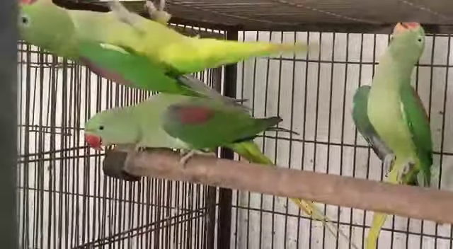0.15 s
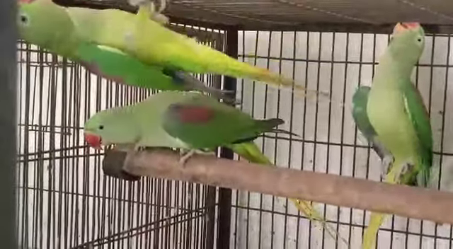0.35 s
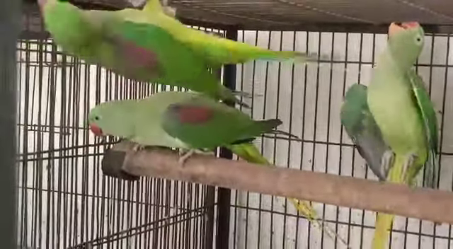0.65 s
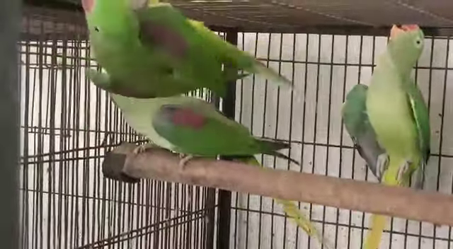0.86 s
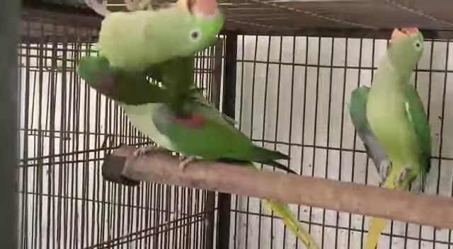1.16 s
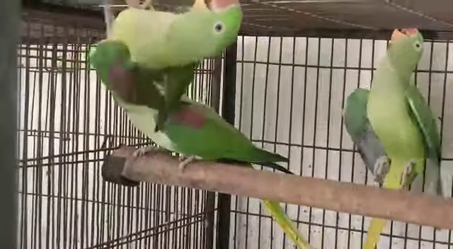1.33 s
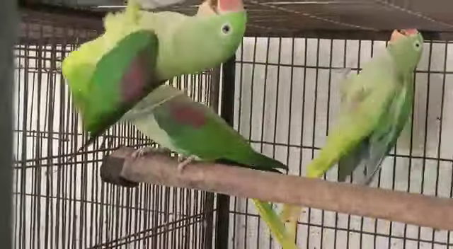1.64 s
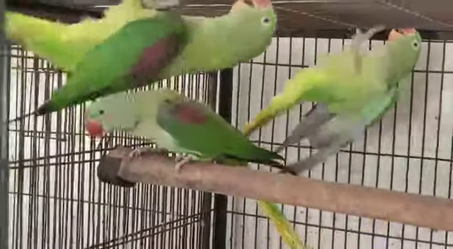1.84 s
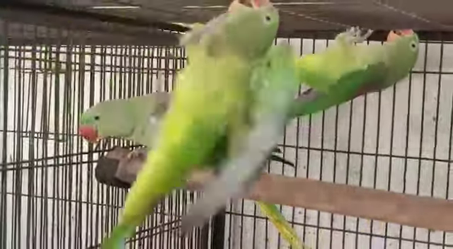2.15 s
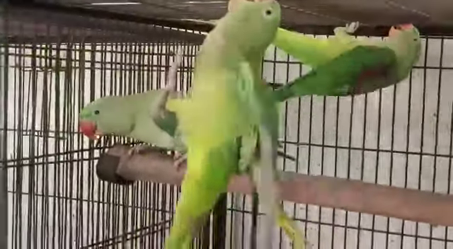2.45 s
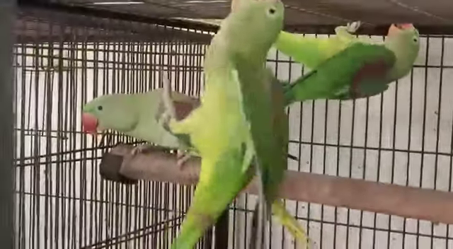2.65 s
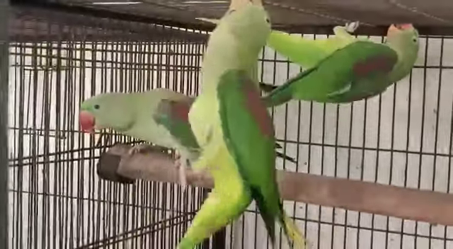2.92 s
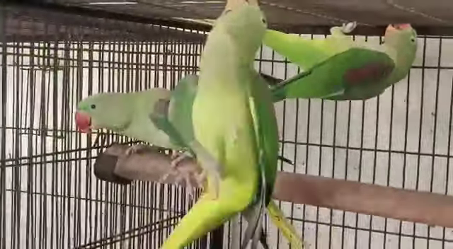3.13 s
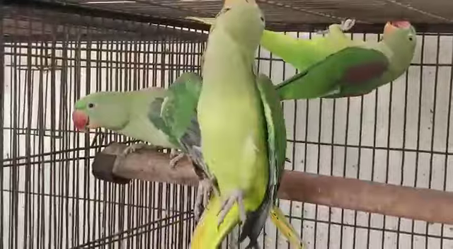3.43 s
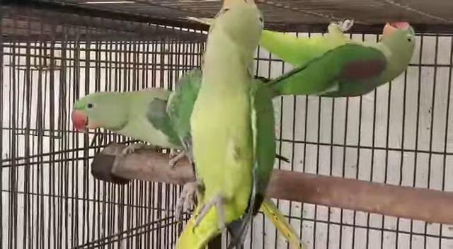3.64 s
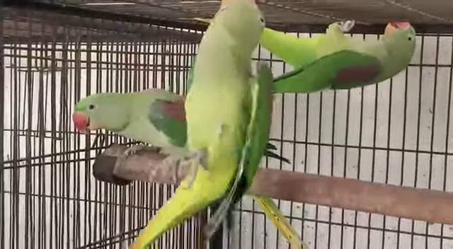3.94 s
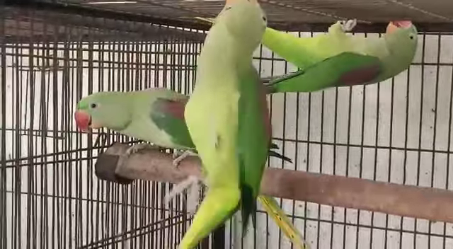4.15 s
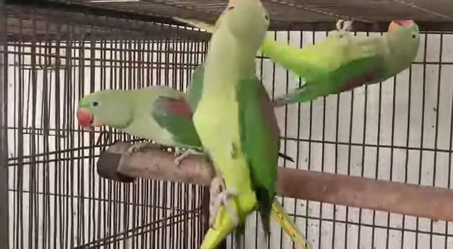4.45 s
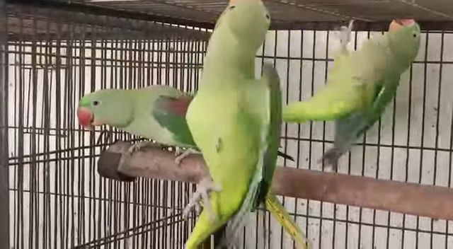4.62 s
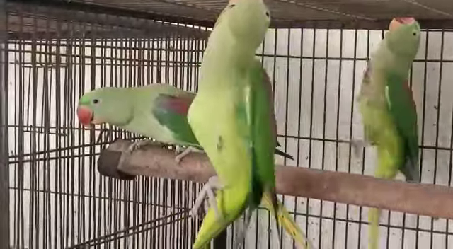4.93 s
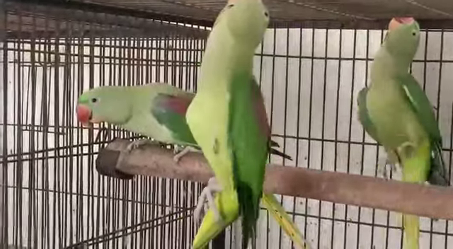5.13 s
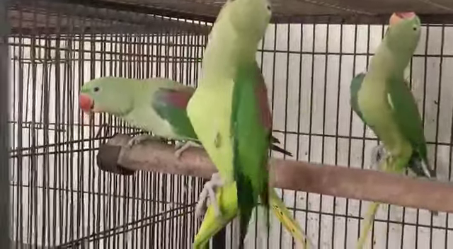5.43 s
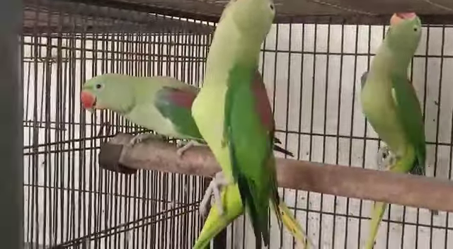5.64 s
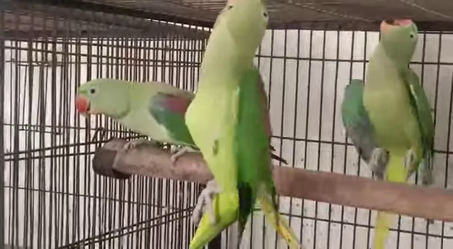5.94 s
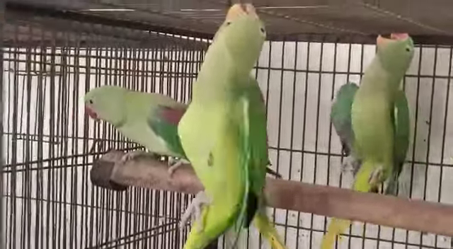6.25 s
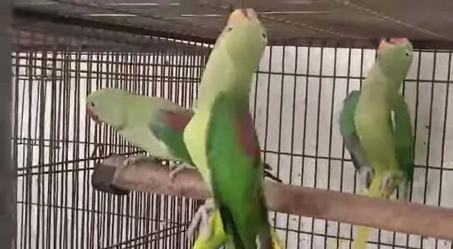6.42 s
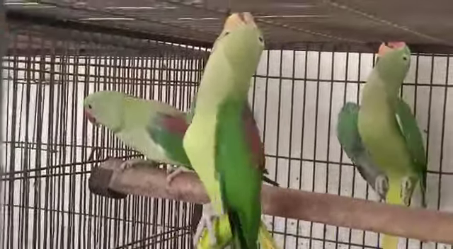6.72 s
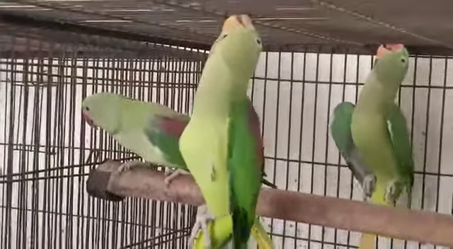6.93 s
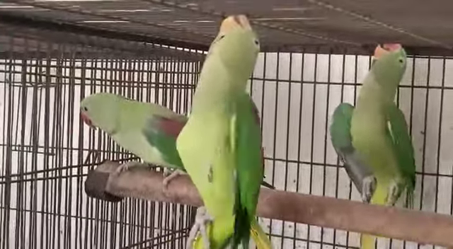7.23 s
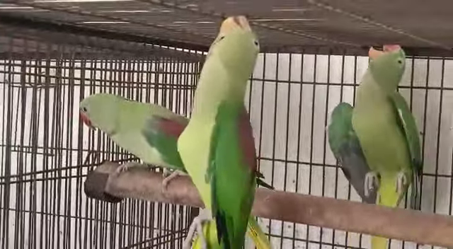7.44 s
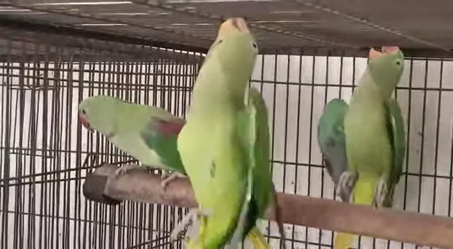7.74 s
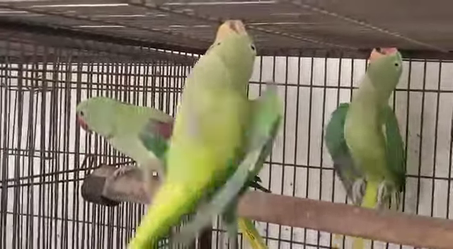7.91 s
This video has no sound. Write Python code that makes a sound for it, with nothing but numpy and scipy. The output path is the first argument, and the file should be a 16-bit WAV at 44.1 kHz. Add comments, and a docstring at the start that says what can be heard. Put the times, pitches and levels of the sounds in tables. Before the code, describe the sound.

Seven brief, loud parrot squawks ring off hard walls, whistly and raspy by turns, with light feather and claw brushes and a weak low engine hum.

```python
"""In a hard-walled room, parakeets squawk seven times from a wire cage.
Each squawk strings together notes of a vibrating membrane: whistles that leap in register, then a
fall split into half-tones with a rasp. One tone colour filters them all and room echoes follow.
Filtered noise makes puffs of air on the microphone, brushes on the wires, rumble, wash and hiss;
a distant engine hums as two wavering harmonics."""
import sys
import numpy as np
from scipy import signal
from scipy.fft import rfft, irfft, next_fast_len
from scipy.io import wavfile
from scipy.ndimage import uniform_filter1d, minimum_filter1d

SR = 44100
rng = np.random.default_rng(int(sys.argv[2]) if len(sys.argv) > 2 else 0)


def transcribe(signal):
    """Save signal, clipped to [-1, 1], as a 16-bit WAV file at the path in sys.argv[1]."""
    frames = np.atleast_2d(signal).T
    limited = np.clip(frames, -1, 1)
    pcm = np.round(limited * 32767).astype(np.int16)
    wavfile.write(sys.argv[1], SR, pcm)


N = 356151
TIME = np.arange(N) / SR   # s
CUTOFF_HZ = 15600

# Background levels over time. Each row: time in s, relative rumble level in dB, relative wash level in dB.
BACKGROUND = [(0.0, -54, -55), (0.4, -51.5, -53), (0.74, -64.5, -63), (1.57, -63, -63.5),
              (2.32, -54, -57.5), (2.72, -63, -64.5), (3.26, -74, -78), (3.87, -71.5, -71.5),
              (4.36, -79, -82.5), (5.35, -70.5, -75), (6.03, -66, -67.5), (6.34, -75, -79),
              (7.38, -74.5, -75), (8.08, -79, -82.5)]
# Spectra of rumble, wash and steady room hiss. Each row: frequency in Hz, relative level in dB.
RUMBLE = [(15, -66.5), (25, -30), (75, -3.5), (93, -0.5), (135, 5), (194, -2), (313, -1), (403, -10),
          (532, -24.5), (600, -14), (780, -48), (1320, -120)]
WASH = [(240, -35.5), (400, -9), (602, -2), (979, -2.5), (1120, 2.5), (1430, -3), (2510, -3.5), (4530, -22),
        (6220, -18), (10100, -52.5), (15000, -50.5)]
HISS = [(470, -39.5), (800, -18), (938, -13), (1130, 1.5), (1690, -3), (1890, 0), (2270, 1.5), (3400, -9),
        (5220, -16), (6930, -11.5), (9890, -46), (15000, -42)]
HISS_DB = -62
# Likeness of the two ears in noise. Each row: frequency in Hz, left-right correlation from -1 to 1.
LIKENESS = [(40, 1), (130, .65), (300, 0.75), (600, 0.88), (1200, -0.44), (2400, 0.16), (5000, -0.24),
            (12000, -0.15)]
# Louder spells of the engine. Each row: start in s, length in s, level in dB added to the idle.
ENGINE_SWELLS = [(0, 3.05, -66), (4.9, .95, -60.5)]
# Mean engine pitch over time. Each row: time in s, pitch in Hz.
ENGINE_SPEED = [(0, 143), (4.9, 141.8), (6, 150.2), (8.08, 151)]
ENGINE_IDLE_DB, ENGINE_RISE_S, ENGINE_FADE_S = -77.5, 0.063, 0.1

# Claws and feathers on the wires. Each row: start in s, relative level in dB, rise in s, fade time constant in s.
BRUSHES = [(.005, -55.5, 0.0025, 0.088), (.101, -51, 0.0045, 0.12), (.4, -57.5, 0.015, .05),
           (1.246, -62.5, 0.0091, 0.15), (1.429, -63.5, 0.014, .08), (1.696, -61, 0.0067, 0.023),
           (1.726, -56, 0.0043, 0.063), (1.94, -58, 0.0018, 0.075), (2.051, -60, .003, 0.04),
           (5.659, -63, 0.0068, .03)]
# Modes of the wires. Each row: frequency in Hz, relative drive in dB, time to fall 60 dB in s.
WIRES = [(5100, -9.5, 0.11), (6300, -7, 0.26), (6500, -3.5, .15), (8240, -12.5, .2)]
# Spectrum of rustling feathers. Each row: frequency in Hz, relative level in dB.
FEATHERS = [(1500, -17), (3500, -1), (6500, 4.5), (8000, -7), (11000, -26.5), (15000, -21)]

# How the bird faces for each squawk. Each row: start in s, brightness in dB per octave before each note's own
# is added, left-right level in dB, left ear lag in s, room send in dB.
SQUAWKS = [(.5, 1.5, -1.5, .00008, -0.9), (2.3, -1.24, 0.5, -.00034, 0.26), (2.58, -1.5, 0, .00032, -0.9),
           (2.95, -1, -0.5, .00032, 1), (3.7, 1, 0.4, .00001, -2.5), (5.9, 1.3, 1.5, .00008, 0.2),
           (7.4, 0.9, 1.6, .00008, -0.1)]
# Tone colour of the voices, from throat, room and microphone together.
# Each row: frequency in Hz, relative level in dB.
VOICE_COLOUR = [(450, -23), (950, -20), (1250, -17), (1550, -15), (2050, 0), (2450, 7), (3400, -2),
                (4050, -2.5), (4450, -12.5), (4800, -10), (5400, -7.5), (6300, -1.5), (7100, -12.5),
                (7900, -18), (12000, -44), (15000, -32.5)]
# Head shadow: the left ear hears less treble. Each row: frequency in Hz, left-right level in dB.
SHADE = [(1500, -3), (4000, -0.5), (7000, -9.5), (10000, -11.5)]
# Echoes off the cage roof, tray and nearest walls. Each row: left delay in s, right delay in s, gain in dB.
ECHOES = [(.0031, 0.0025, -8), (.0058, .0064, -5), (.0093, .0087, -16), (0.0103, .0131, -11.5),
          (0.0164, .0166, -17.5), (.0215, .0229, -16)]
ROOM_T60_S = 0.37
ATTACK_S, RELEASE_S = .004, .007   # every note sounds for its length, then its release
WAVER_SHARE, WAVER_HZ = .003, 45   # no note is quite steady

# A clear squawk runs bark, high whistle, low whistle, fall (and croak);
# a harsh one runs lead-in, (grating,) fall, standing-out third half-tone or croak. Note levels are relative.
# Opening barks. Each row: start in s, length in s, level in dB, pitch after the catch in Hz, half-tone share 0-1.
BARKS = [(.558, 0.015, -10.5, 2566, 1), (3.782, 0.016, -20, 2567, 0.82), (5.964, .013, -17, 2360, .05),
         (7.426, 0.01, -20, 3240, 0.62)]
CATCH_HZ, CATCH_SINK_HZ_PER_S, CATCH_S = 2472, 71000, .006
# High whistles. Each row: start in s, length in s, pitch in Hz before the droop, level in dB before the
# swell, droop time constant in s.
HIGH_WHISTLES = [(0.583, 0.034, 3582, -11, 0.015), (3.806, 0.04, 3520, -15, 0.0037),
                 (5.982, .055, 3650, -18.5, .005), (7.454, 0.048, 3570, -19.5, 0.0039)]
DROOP_SHARE, DROOP_SWELL_DB = .14, 1.5
# Puffs of air. Each row: centre in s, Gaussian spread in s, relative level in dB, low edge in Hz, top edge in Hz.
PUFFS = [(0.608, 0.0075, -45.5, 81.5, 255), (0.758, 0.0074, -46.5, 70, 316),
         (3.822, 0.022, -46.5, 72.8, 180), (3.835, 0.013, -41.5, 400, 1200),
         (3.844, 0.0077, -33, 74.4, 192), (3.968, 0.0098, -40.5, 70, 394), (6.036, 0.0023, -43.5, 504, 660),
         (7.496, 0.01, -49.5, 67.4, 160), (7.629, 0.027, -54, 71.5, 500)]
# Low whistles after the break. Each row: start in s, length in s, base pitch in Hz, opening level in dB,
# fade in dB per s, upward creep in Hz per s.
LOW_WHISTLES = [(.621, 0.079, 2289, 0.5, 326, 950), (3.847, 0.071, 2336, -10, 139, 3210),
                (6.039, 0.075, 2370, -8.5, 221.5, 3870), (7.503, 0.063, 2393, -9.5, 169, 3370)]
SCOOP_HZ, SCOOP_S = 268, .006
# Falling split notes. Each row: start in s, length in s, hold in s, slide time constant in s, slide shape
# (1 eases out, more is S-shaped), top pitch in Hz, landing pitch in Hz, top level in dB, landing level in dB,
# landing half-tone share 0-1, sliding rasp, landing rasp (both on top of a base), brightness in dB per octave.
FALLS = [(0.694, 0.11, 0.03, 0.047, 1.34, 3394, 2072, -18.5, -8, 0.41, 0.085, 0.18, 0.5),
         (2.417, 0.067, 0.0031, 0.031, 1.59, 3860, 2418, -18, -8.5, 0.24, .75, .9, -.8),
         (2.731, 0.12, 0.0014, .04, 1.48, 3205, 1911, -16, -23.5, .7, 0.78, 0.27, -0.13),
         (3.098, 0.11, 0.00078, 0.044, 1.45, 3128, 1974, -21, -30, 0.74, 0.87, 0.26, -.3),
         (3.913, .108, 0.024, .032, 1.25, 3503, 2314, -19, -12.5, 0.39, 0.099, .14, 0.33),
         (6.104, 0.11, 0.0047, .04, 3.83, 3980, 2732, -22.5, -13.5, 0.37, .45, 0.17, .3),
         (7.577, 0.1, 0.00089, 0.032, 2.48, 4016, 2610, -21.5, -17, 0.5, 0.22, 0.29, -0.00067)]
TOP_HALF_SHARE, BASE_RASP = 0.48, 0.11
# Croaks at the very end. Each row: start in s, length in s, level in dB.
CROAKS = [(.814, .02, -19.5), (2.467, 0.02, -16.5), (4.016, .018, -20)]
CROAK_HZ, CROAK_SINK_S = 2113, .03
# Pure notes leading into a harsh squawk. Each row: start in s, length in s, mid-note pitch in Hz,
# peak level in dB, swell time in s.
LEAD_INS = [(2.387, 0.037, 2224, -10, 0.034), (2.609, .04, 2396, -12, 0.013),
            (2.975, .04, 2388, -13.5, 0.031)]
LEAD_SWELL_DB_PER_S, LEAD_RISE_HZ_PER_S = 419, 3000
# Gratings. Each row: start in s, length in s, pitch in Hz, opening level in dB, second tone level in dB.
GRATINGS = [(2.647, .083, 2473, -12, -27), (3.017, 0.07, 2478, -15.5, -31)]
SECOND_TONE_HZ, SECOND_RISE_HZ_PER_S = 3550, 2900
UNDERTONE_HZ, UNDERTONE_DB, GRATING_FADE_DB_PER_S = 2030, -7, 126.5
# The third half-tone standing out as two harsh falls end, sinking to a settled pitch.
# Each row: start in s, length in s, settled pitch in Hz, level in dB.
THIRD_HALF_TONES = [(2.79, .058, 2882, -19), (3.161, .046, 2909, -21.5)]
THIRD_SINK_HZ, THIRD_SINK_S = 220, .016


def from_db(db):
    """A level in decibels is twenty times the logarithm of the gain."""
    return 10 ** (np.asarray(db) / 20)


def unit_power(x):
    """Division by the root mean square gives unit power."""
    return x / np.sqrt(np.mean(x ** 2) + 1e-20)


def in_time(rows, t):
    """Linear interpolation reads each column of a time table at the times t."""
    s, *columns = np.transpose(rows)
    return [np.interp(t, s, column) for column in columns]


def at_hz(points, hz):
    """Interpolation on a logarithmic frequency axis reads a spectrum."""
    f, value = np.transpose(points)
    return np.interp(np.log(np.maximum(hz, 1)), np.log(f), value)


def wobble(rate_hz, size):
    """Low-passed white noise of unit power wanders slowly."""
    low_pass = signal.butter(2, rate_hz, fs=SR, output="sos")
    settled = signal.sosfilt(low_pass, rng.standard_normal(2 * size))[size:]
    return unit_power(settled)


def coloured(spectrum, size):
    """Shaping white noise in frequency colours it; mixing mid and side sets its left-right correlation."""
    hz = np.arange(size // 2 + 1) * SR / size
    mid, side = rfft(rng.standard_normal((2, size)))
    alike = np.clip(at_hz(LIKENESS, hz), -1, 1)
    pair = np.sqrt(1 + alike) * mid + np.sqrt(1 - alike) * side * [[1], [-1]]
    # fade beyond both ends of the table
    below_top = 1 / (1 + (hz / spectrum[-1][0]) ** 8)
    above_low = 1 - 1 / (1 + (hz / spectrum[0][0]) ** 8)
    shape = below_top * above_low * from_db(at_hz(spectrum, hz))
    return unit_power(irfft(pair * shape, size))


def engine():
    """A periodic source radiates harmonics; random drift of its rate and strength makes it throb."""
    pitch, = in_time(ENGINE_SPEED, TIME)
    level = from_db(ENGINE_IDLE_DB)
    for s, length, db in ENGINE_SWELLS:
        rise = np.clip((TIME - s) / ENGINE_RISE_S, 0, 1)
        fade = np.exp(-np.maximum(TIME - s - length, 0) / ENGINE_FADE_S)
        level = level + from_db(db) * rise * fade
    phase = 2 * np.pi * np.cumsum(pitch * (1 + 0.017 * wobble(10, N))) / SR
    throb = 1 + .25 * wobble(25, N)
    harmonics = np.sin(phase) + 0.11 * np.sin(2 * phase)
    return np.sqrt(2) * level * harmonics * throb


def background(rumble_db=5.5, wash_db=9.5):
    """Independent sources add: changing rumble and wash, the engine's hum and a steady hiss."""
    rumble, wash = in_time(BACKGROUND, TIME)
    hum = engine()
    lumps_db = 1.6 * wobble(12, N)   # the rumble swells and sags unevenly
    low = hum + from_db(rumble + rumble_db + lumps_db) * coloured(RUMBLE, N)
    low = low * from_db([[-1.8], [1.8]])   # stronger on the right
    washing = from_db(wash + wash_db) * coloured(WASH, N)
    return low + washing + from_db(HISS_DB) * coloured(HISS, N)


def brushes(ring_db=-8.0):
    """Friction is a noise force; it rustles in the feathers and excites the wires' damped resonances."""
    touch = 0
    for s, db, rise, fade in BRUSHES:
        decay = np.exp(-np.clip((TIME - s) / fade, 0, 20))
        touch = touch + from_db(db) * np.clip((TIME - s) / rise, 0, 1) * decay
    rustle = touch * coloured(FEATHERS, N) * np.exp(0.23 * wobble(200, N))
    rings = 0
    for hz, db, t60 in WIRES:
        radius, angle = from_db(-60 / (t60 * SR)), 2 * np.pi * hz / SR   # decay and turn per sample
        poles = [1, -2 * radius * np.cos(angle), radius ** 2]
        rings = rings + from_db(db) * signal.lfilter([0, np.sin(angle)], poles, rustle)
    ringing = from_db(ring_db) * rustle.std() * unit_power(rings)
    return (rustle + ringing) * from_db([[-2], [2]])


def clock(length):
    """A note's local time runs from its onset to the end of its release."""
    return np.arange(int((length + RELEASE_S) * SR)) / SR


def to_ears(tone, air, air_db_per_octave, pan_db, lag_s):
    """Source and filter: one tone colour shapes tone and turbulence; the ears differ by lag and head shadow."""
    size = len(tone)
    padded = next_fast_len(2 * size, True)
    hz = np.arange(padded // 2 + 1) * SR / padded
    tone, air = rfft(np.array([tone, air]), padded)
    air *= from_db(air_db_per_octave * np.log2(np.maximum(hz / 2400, 1)))
    air *= hz ** 2 / (hz ** 2 + 700 ** 2)   # little turbulence below 700 Hz
    side = from_db((pan_db + at_hz(SHADE, hz)) / 2)
    ears = np.array([side * np.exp(-2j * np.pi * hz * lag_s), 1 / side])
    heard = (tone + air) * from_db(at_hz(VOICE_COLOUR, hz)) * ears
    return irfft(heard, padded)[:, :size + size // 2]


def syrinx(s, pitch, level_db, half, rasp, edge_db, attack_s=ATTACK_S):
    """Period doubling adds half-tones to the membrane's harmonics; strain adds jitter, turbulence and rattle.

    Returns the first sample, the stereo sound and the room send in dB."""
    slope_db, half_db, top_db = -5.5, 4.5, -4.0   # slope per octave
    jitter, jitter_hz, flutter, flutter_hz = .05, 480, 0.74, 240
    rasp_db, air_slope_db = -5, -8.0
    _, facing_db, pan_db, lag_s, send_db = [row for row in SQUAWKS if row[0] <= s][-1]
    bright_db = facing_db + edge_db
    size = len(pitch)
    t = TIME[:size]
    rise, release = np.clip(t / attack_s, 0, 1), np.clip((t[-1] - t) / RELEASE_S, 0, 1)
    envelope = rise * release * from_db(level_db)
    half, rasp = np.clip(half, 0, 1), np.clip(rasp, 0, 1)
    waver = WAVER_SHARE * wobble(WAVER_HZ, size) + jitter * rasp * wobble(jitter_hz, size)
    phase = 2 * np.pi * np.cumsum(pitch * (1 + waver)) / SR
    multiple = np.arange(1, 21)[:, None] / 2   # half-tones lie between the harmonics
    partial_hz = multiple * pitch
    # sharper closures in the split register bring out the overtones
    tilt_db = (slope_db * (1 - 0.29 * half) + bright_db) * np.log2(np.maximum(multiple, 1))
    # the membrane closes softly, so the topmost overtones stay faint
    soft_db = top_db * np.clip((partial_hz - 7300) / 1000, 0, 1)
    gain = from_db(tilt_db + soft_db) * (partial_hz < CUTOFF_HZ)
    gain[::2] *= half * from_db(half_db)
    # divide by the level the tone colour will pass, so that notes keep their set level
    passed = np.sqrt(np.sum((gain * from_db(at_hz(VOICE_COLOUR, partial_hz))) ** 2, axis=0) / 2)
    tone = np.sum(gain * np.sin(multiple * phase), axis=0) / passed
    air = rng.standard_normal(size) * rasp ** 2 * from_db(rasp_db)
    depth = flutter * rasp
    rattle = np.exp(depth * 2 * np.tanh(wobble(flutter_hz, size) / 2) - depth ** 2 / 2)
    strength = rattle * envelope
    voice = to_ears(tone * strength, air * strength, air_slope_db + bright_db, pan_db, lag_s)
    return int(s * SR), voice, send_db


def bark(s, length, db, split_hz, half):
    """A register jump: the voice catches on a sinking squeak, then leaps into a rough split burst."""
    t = clock(length)
    caught = t > CATCH_S
    pitch = np.where(caught, split_hz, CATCH_HZ - CATCH_SINK_HZ_PER_S * t)
    return syrinx(s, pitch, db, half * caught, rasp=0.84, edge_db=-1.3)


def room(x, late_db=0.0, build_s=0.0036, treble_db=-3.5):
    """Convolution with discrete early echoes and an exponentially decaying diffuse tail reverberates."""
    t = TIME[:SR]
    decay = from_db(-60 * t / ROOM_T60_S)
    late = rng.standard_normal((2, SR)) * decay * (1 - np.exp(-t / build_s))
    response = from_db(late_db) * unit_power(late) / np.sqrt(SR)
    for left_s, right_s, db in ECHOES:
        response[[0, 1], [round(left_s * SR), round(right_s * SR)]] += from_db(db)
    size = next_fast_len(N + SR)
    hz = np.arange(size // 2 + 1) * SR / size
    dull = from_db(treble_db * hz / 7000)   # treble_db is the loss at 7 kHz
    return irfft(rfft(x, size) * rfft(response, size) * dull, size)[:, :N]


def high_whistle(s, length, hz, db, droop_s):
    """Rising strain drives a clean held note louder, flatter and rougher towards the register break."""
    strain = np.exp(np.minimum(clock(length) - length, 0) / droop_s)
    pitch = hz * (1 - DROOP_SHARE * strain)
    return syrinx(s, pitch, db + DROOP_SWELL_DB * strain, half=.03, rasp=0.033 + 0.37 * strain, edge_db=-1.8)


def puffs():
    """Eddies at the microphone make short band-limited pressure noise, partly shared by both channels."""
    out = np.zeros((2, N))
    for s, spread_s, db, low_hz, top_hz in PUFFS:
        near = np.flatnonzero(abs(TIME - s) < .1)
        band = signal.butter(2, [low_hz, top_hz], "band", fs=SR, output="sos")
        eddies = unit_power(signal.sosfilt(band, rng.standard_normal((3, len(near)))))
        gust = from_db(db) * np.exp(-.5 * ((TIME[near] - s) / spread_s) ** 2)
        out[:, near] += (eddies[0] + 0.76 * eddies[1:]) * gust
    bass_cut = signal.butter(3, 75, "high", fs=SR, output="sos")
    return signal.sosfilt(bass_cut, out + 1e-18) * from_db([[-3], [3]])


def low_whistle(s, length, hz, db, fade_db_per_s, creep_hz_per_s):
    """The lower register: pitch scoops down exponentially, then creeps up as the level fades."""
    t = clock(length)
    pitch = hz + SCOOP_HZ * np.exp(-t / SCOOP_S) + creep_hz_per_s * t
    return syrinx(s, pitch, db - fade_db_per_s * t, half=0.008, rasp=0.23, edge_db=1.6)


def fall(s, length, hold, slide, shape, top_hz, landing_hz, top_db, landing_db,
         landing_half, sliding_rasp, landing_rasp, edge_db):
    """Relaxation: a period-doubled note slides to a lower pitch, with extra rasp in mid-slide."""
    fallen = 1 - np.exp(-(np.maximum(clock(length) - hold, 0) / slide) ** shape)
    pitch = top_hz + (landing_hz - top_hz) * fallen
    db = top_db + (landing_db - top_db) * fallen
    half = TOP_HALF_SHARE + (landing_half - TOP_HALF_SHARE) * fallen
    rasp = BASE_RASP + sliding_rasp * np.sin(np.pi * fallen) + landing_rasp * fallen
    return syrinx(s, pitch, db, half, rasp, edge_db, attack_s=0.011)


def croak(s, length, db):
    """As pressure gives out, the pitch decays exponentially amid strong rattle."""
    pitch = CROAK_HZ * np.exp(-clock(length) / CROAK_SINK_S)
    return syrinx(s, pitch, db, half=0.56, rasp=.9, edge_db=-0.4)


def lead_in(s, length, hz, db, swell_s):
    """A nearly pure oscillation grows exponentially to full strength while its pitch rises."""
    t = clock(length)
    pitch = hz + LEAD_RISE_HZ_PER_S * (t - length / 2)
    level_db = db + LEAD_SWELL_DB_PER_S * np.minimum(t - swell_s, 0)
    return syrinx(s, pitch, level_db, half=.02, rasp=0.064, edge_db=0.5)


def grating(s, length, hz, db, second_db):
    """Superposition: a fading note beats against a rough undertone and a second, unrelated vibration."""
    t = clock(length)
    second_hz = SECOND_TONE_HZ + SECOND_RISE_HZ_PER_S * t
    return [syrinx(s, np.full_like(t, hz), db - GRATING_FADE_DB_PER_S * t, half=.02, rasp=0.37, edge_db=0.5),
            syrinx(s, np.full_like(t, UNDERTONE_HZ), db + UNDERTONE_DB, half=.02, rasp=0.96, edge_db=-11.5),
            syrinx(s, second_hz, second_db, half=0.7, rasp=.75, edge_db=4.8)]


def third_half_tone(s, length, hz, db):
    """The fall's third half-tone stands out: added as a partial sinking exponentially to a settled pitch."""
    pitch = hz + THIRD_SINK_HZ * np.exp(-clock(length) / THIRD_SINK_S)
    return syrinx(s, pitch, db, half=.02, rasp=0.11, edge_db=-9, attack_s=0.018)


def scene(voice_db=-5.5):
    """Sound fields add: direct voices, their reverberation, puffs, brushes and background."""
    kinds = [(bark, BARKS), (high_whistle, HIGH_WHISTLES), (low_whistle, LOW_WHISTLES), (fall, FALLS),
             (croak, CROAKS), (lead_in, LEAD_INS), (third_half_tone, THIRD_HALF_TONES)]
    notes = [sing(*row) for sing, rows in kinds for row in rows]
    for row in GRATINGS:
        notes += grating(*row)
    direct, sent = np.zeros((2, 2, N))
    for start, voice, send_db in notes:
        span = slice(start, start + voice.shape[1])
        direct[:, span] += voice
        sent[:, span] += from_db(send_db) * voice
    birds = from_db(voice_db) * (direct + room(sent))
    return birds + puffs() + brushes() + background()


def record(dry):
    """A steep low-pass cuts the top; a smoothed gain limits the loudest peaks in both channels alike."""
    low_pass = signal.ellip(10, .1, 80, CUTOFF_HZ, fs=SR, output="sos")
    sound = signal.sosfilt(low_pass, dry)
    allowed = np.minimum(1, .88 / (np.abs(sound).max(axis=0) + 1e-9))
    held = minimum_filter1d(allowed, size=401)
    return sound * uniform_filter1d(uniform_filter1d(held, size=201), size=201)


dry = scene()
out = record(dry)
transcribe(out)
```